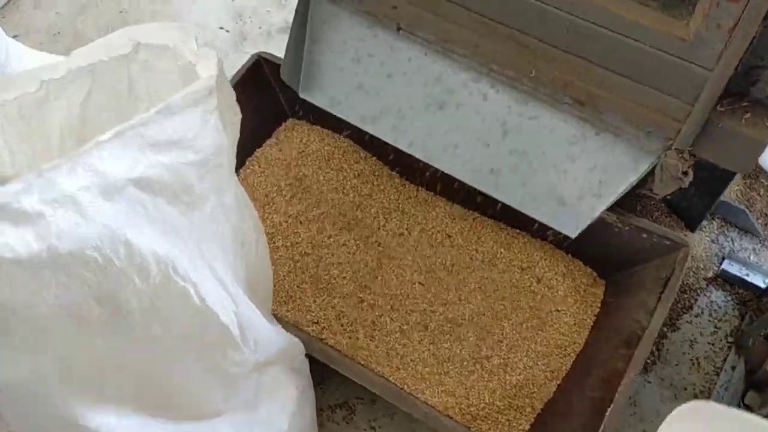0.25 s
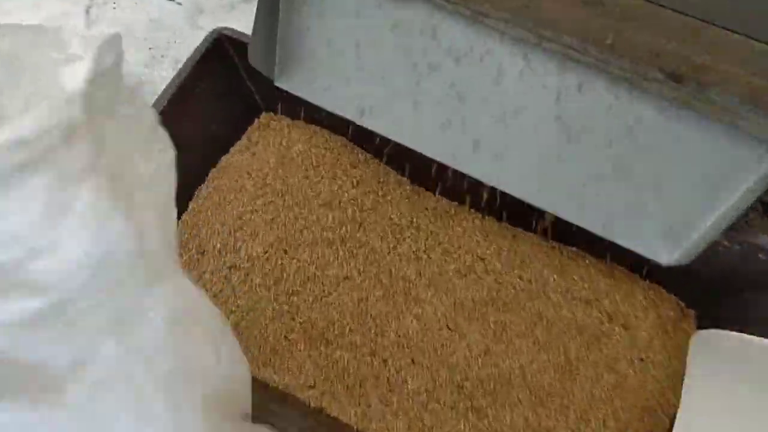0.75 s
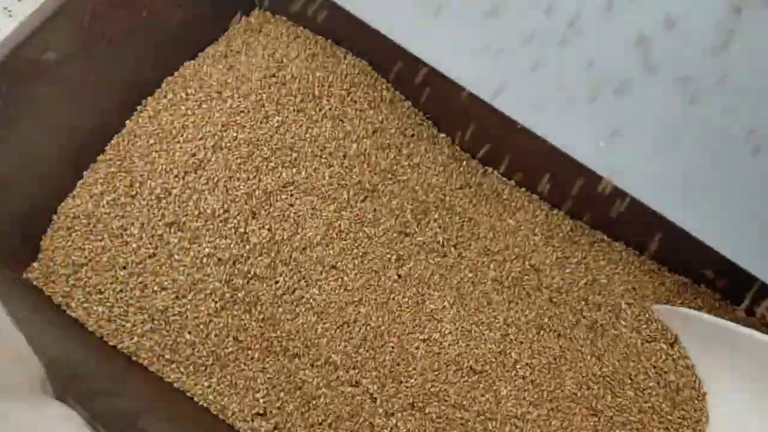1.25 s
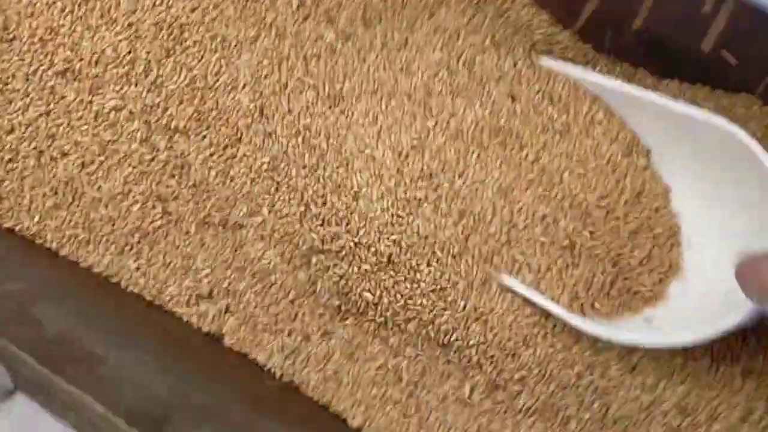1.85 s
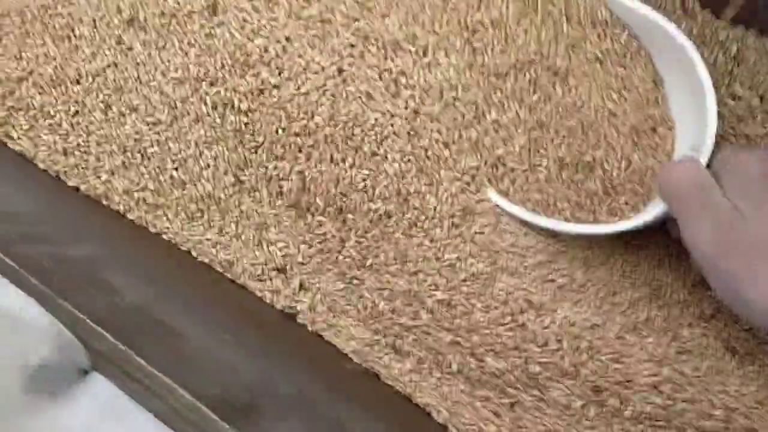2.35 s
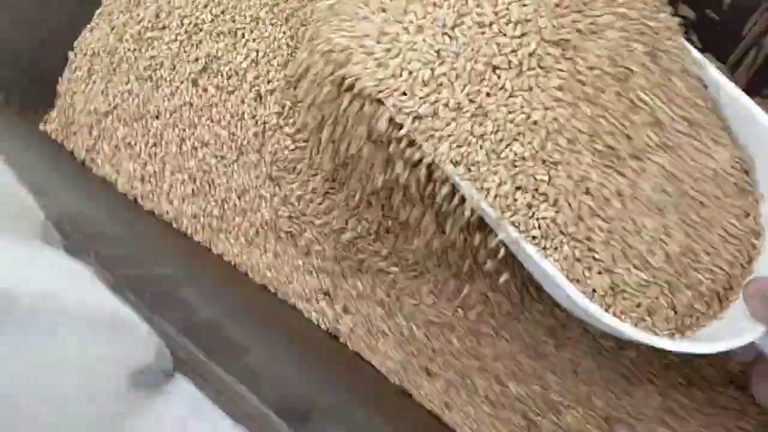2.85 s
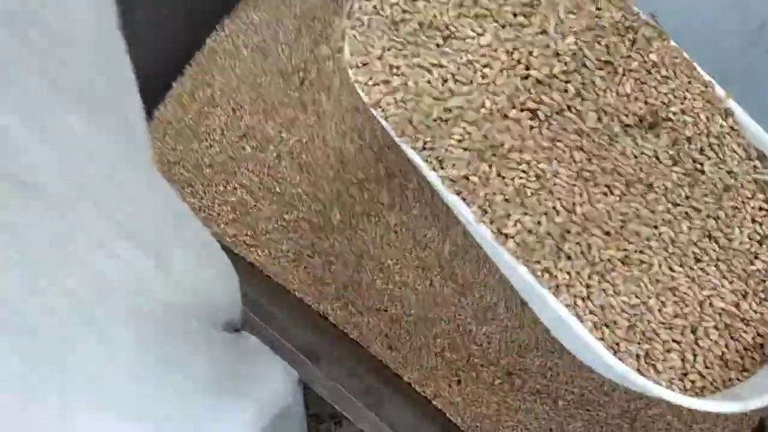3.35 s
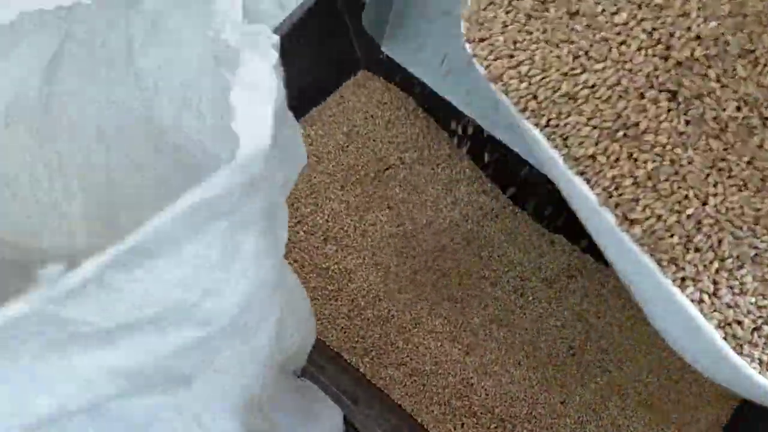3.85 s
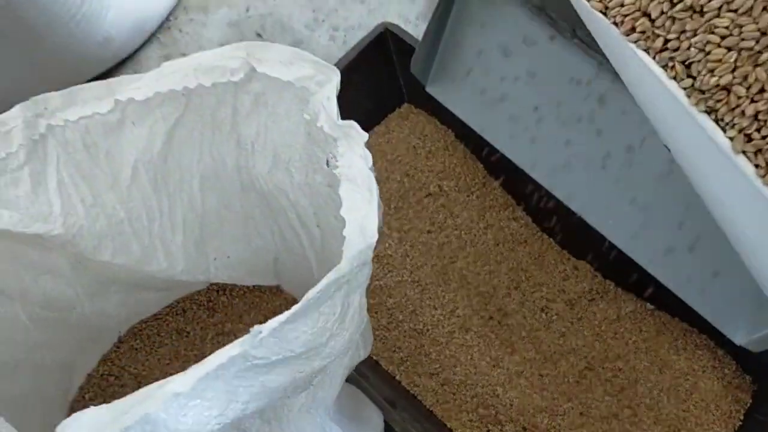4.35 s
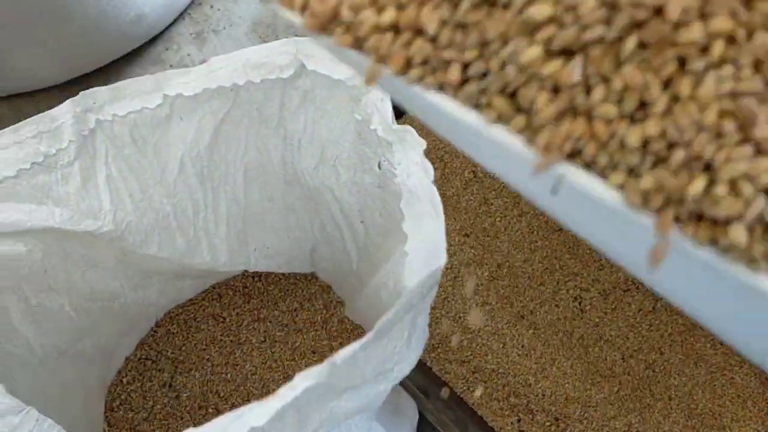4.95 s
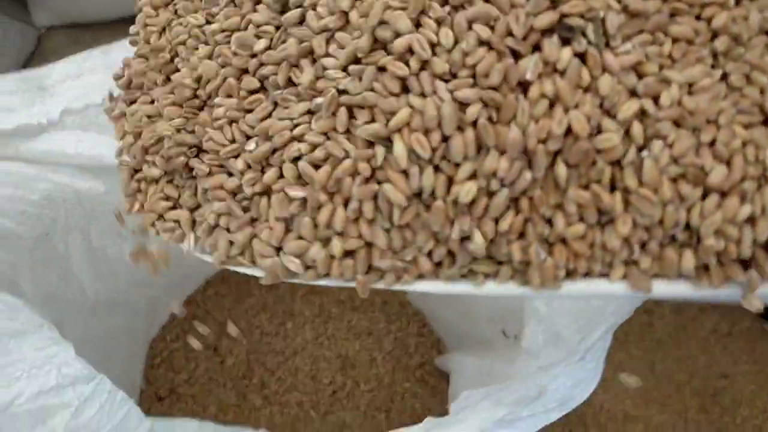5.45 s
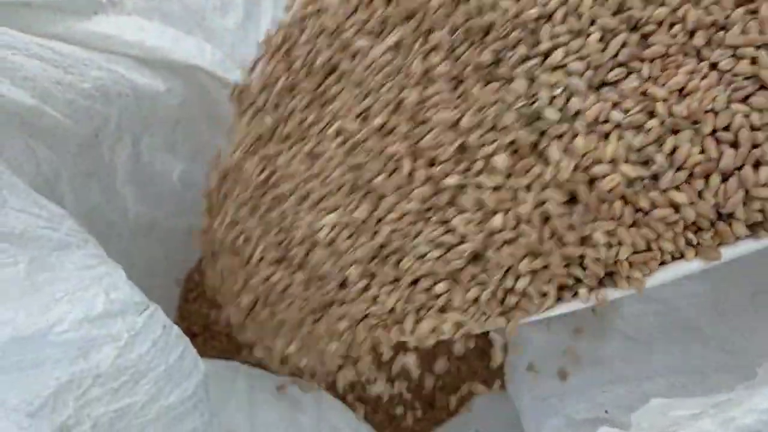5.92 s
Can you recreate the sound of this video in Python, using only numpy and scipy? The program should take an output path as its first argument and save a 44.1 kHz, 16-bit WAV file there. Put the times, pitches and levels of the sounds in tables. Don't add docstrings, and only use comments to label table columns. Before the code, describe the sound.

Inside a workshop, a grain cleaner runs without pause: a low, even fan hum near 175 hertz, broad airy roar and a higher rotor whir whose tones swell and fade. Over it, kernels shaken down a metal chute make a bright, sandy hiss pulsing about six times a second. Small dry ticks land close by. A hand-held microphone moves around the bin, so the balance shifts gently.

```python
import sys
import numpy as np
from scipy import signal
from scipy.io import wavfile
from scipy.ndimage import uniform_filter1d

SR = 44100
rng = np.random.default_rng(int(sys.argv[2]) if len(sys.argv) > 2 else 0)


def put_to_file(sound):
    columns = np.atleast_2d(sound).T
    safe = np.clip(columns, -1, 1)
    whole_steps = np.round(safe * 32767)
    wavfile.write(sys.argv[1], SR, whole_steps.astype(np.int16))


def volts(x):
    e = np.asarray(x, float) / 20
    return 10 ** e


N = 272538
SIEVE_HZ = 6.347

# start_s [s], level_db [dB], throb_db [dB]
FAN_DISTANCE = [(0.0, -19.3, 0.6), (0.45, -17.9, 1.1), (0.95, -19.3, 0.8), (1.4, -21.3, 1.6),
                (1.7, -23.1, 0.7), (2.1, -22.1, 2.3), (2.6, -22.9, 1.6), (3.1, -21.4, 1.6),
                (3.6, -19.6, 1.2), (4.1, -17.1, 0.4), (4.7, -17.6, 0.2), (5.2, -17.3, 1.3),
                (5.7, -19.1, 0.5), (6.18, -21.7, 2.1)]


def evened(x):
    return x / np.sqrt(np.mean(x ** 2) + 1e-20)


def read(points, hz):
    f, value = np.transpose(points)
    return np.interp(np.log(hz + 1), np.log(f + 1), value)


def curves(rows, t):
    s, *columns = np.transpose(rows)
    return [np.interp(t, s, c) for c in columns]


def drift(low_hz, top_hz):
    f = np.geomspace(low_hz, top_hz, num=20)
    t = np.arange(0, N + 128, 128) / SR
    sines = np.sin(2 * np.pi * (f[:, None] * t + rng.random((len(f), 1))))
    return np.interp(np.arange(N) / SR, t, evened(sines.T @ f ** -.5))


def coloured(x, points):
    log_gain = read(points, abs(np.fft.fftfreq(4096, 1 / SR))) * np.log(10) / 20
    taps = np.fft.ifft(np.exp(np.conj(signal.hilbert(log_gain)))).real[:2048]
    return evened(signal.oaconvolve(x, taps)[:N])


def away_db(t):
    mean_db = -20
    return mean_db - curves(FAN_DISTANCE, t)[0]


def throb_db(duck=1):
    # start_s [s], depth_db [dB]
    surges = [(0.133, 1.3), (0.26, 2.0), (0.699, 1.5), (1.197, 1.2), (1.587, 1.5), (1.777, 4.1),
              (2.111, 2.1), (2.461, 1.5), (2.991, 1.2), (3.327, 1.0), (3.868, 2.4), (5.15, 2.3),
              (5.612, 1.6)]
    peak_s, lean, duck_s = .0555, .33, .033
    t = np.arange(0, N + 64, 64) / SR
    stroke = 2 * np.pi * SIEVE_HZ * (t - peak_s)
    out = curves(FAN_DISTANCE, t)[1] * (np.cos(stroke) + lean * np.sin(2 * stroke))
    for start_s, depth_db in surges:
        u = np.maximum(t - start_s, 0) / duck_s
        out -= duck * depth_db * u * np.exp(1 - u)
    return np.interp(np.arange(N) / SR, t, out)


def shaft(turn_hz, orders, belt, shake, waver_db, lift_db):
    belt_hz = 2.25
    t = np.arange(N) / SR
    angle = 2 * np.pi * np.cumsum(turn_hz + 0 * t) / SR
    angle = angle + belt * np.sin(2 * np.pi * belt_hz * t + 3.16) + shake * drift(0.401, 9)
    waver = drift(1.198, 12)
    out = np.zeros(N)
    for i, (order, level_db) in enumerate(orders):
        share = (level_db < -3) * min(.15 + order / 18, 1.3)
        loose_db = share * waver_db * np.roll(waver, 31000 * i) + lift_db(order)
        tone = np.cos(round(order) * angle + 2 * np.pi * rng.random())
        out += volts(level_db + loose_db) * np.sqrt(2) * tone
    return out


def fan():
    fan_orders = [(2, -35), (3, -26), (4, -51), (5, -29.5), (6, -27.5), (8, 0), (10, -69), (11, -34),
                  (13, -29), (14, -56), (16, -20.5), (24, -34)]
    return shaft(21.9, fan_orders, 0.024, 0.0049, 1.2, lambda order: 0)


def roar():
    roar_colour = [(20, -22), (38, -4), (60, -9), (150, 0.5), (400, -0.5), (520, -3.5), (800, -2.5),
                   (1200, -9.5), (1450, -5.5), (1650, -10), (1950, -7.5), (2300, -12.5), (3000, -18.5),
                   (7000, -35)]
    level_db = -10.5
    gusts = rng.standard_normal(N) * volts(1.04 * drift(8, 80))
    return volts(level_db) * coloured(gusts, roar_colour)


def placed(x):
    place = [(90, 0.26, 2.5), (175, 0, 0), (330, 0.43, 1), (800, 0.2, 3), (1800, 0.42, 3)]
    facing_until_s, turn_s = 0.5, .06
    hz, s, z = signal.stft(x, SR, nperseg=2048)
    facing = 1 / (1 + np.exp((s - facing_until_s) / turn_s))
    pitch_hz, undone, lift_db = np.transpose(place)
    undone = read(np.transpose([pitch_hz, undone]), hz)[:, None]
    lift_db = read(np.transpose([pitch_hz, lift_db]), hz)[:, None]
    z = z * volts(undone * away_db(s) + lift_db * facing)
    return signal.istft(z, SR, nperseg=2048)[1][:N]


def rotor():
    rotor_orders = [(1, -43), (2, -38), (3, -30.5), (4, -18), (5, -20), (6, -20), (7, -31.5), (8, -26),
                    (9, -28), (10, -32), (11, -26.5), (12, -32), (13, -33), (14, -32), (15, -32), (19, -42),
                    (20, -33), (21, -25.5), (22, -38), (25, -42), (26, -32), (27, -33.5), (28, -30),
                    (29, -32), (31, -42)]
    # centre_s [s], half_s [half length, s], order [centre of group], lift_db [dB]
    standing_waves = [(.3, .3, 4, 12.5), (.85, 0.12, 4, -5), (3.25, 0.34, 4, 4.5), (5.35, 0.22, 4, 3.5),
                      (5.95, 0.34, 4, 3), (.33, .25, 11, 11.5), (2.7, .45, 11, 5), (1.45, .1, 11, 4),
                      (5.3, .2, 11, 4), (1.68, .15, 15, 10), (3.3, .2, 15, 5), (.06, .06, 21, 4),
                      (.5, .06, 21, 4), (1.14, .07, 21, 3), (2.45, .07, 21, 11), (2.85, .12, 21, 8.5),
                      (3.2, .06, 21, 5), (4, .07, 21, 10), (4.29, .08, 21, 9), (4.68, .08, 21, 7),
                      (5.08, .18, 21, 8.5), (5.35, .06, 21, 5), (.25, .1, 28, 5), (.65, .1, 28, 5),
                      (1.44, .07, 28, 6), (2.4, .08, 28, 4), (3.55, .06, 28, 6), (4.7, .12, 28, 9),
                      (5.2, .15, 28, 4), (6.05, .1, 28, 4)]
    group_reach = {4: 2.6, 11: 1.5, 15: .8, 21: 2.4, 28: 3.2}
    # level_db [dB], undone [share of the fan's distance change undone]
    group_rest = [(-1, 0.75), (-1.5, 1.4), (-2, .6), (-2.5, .2), (-3.5, .3)]
    t = np.arange(0, N + 64, 64) / SR
    groups = {}
    for centre, (level_db, undone) in zip(group_reach, group_rest):
        groups[centre] = level_db + undone * away_db(t)
    for centre_s, half_s, order, db in standing_waves:
        lift = db * np.exp(-((t - centre_s) / half_s) ** 2)
        groups[round(order)] = groups[round(order)] + lift

    def lift_db(order):
        total = sum(np.exp(-((order - c) / reach) ** 4) * groups[c] for c, reach in group_reach.items())
        return np.interp(np.arange(N) / SR, t, total)

    return shaft(68.47 + .04 * drift(.3, 3), rotor_orders, 0.038, .02, 1.3, lift_db)


def machine():
    hum_db = curves(FAN_DISTANCE, np.arange(N) / SR)[0]
    flutter_db = .45 * drift(4, 22)
    return volts(hum_db + throb_db() + flutter_db) * (placed(fan() + roar()) + rotor())


def pings(per_s, t60):
    t, out = np.arange(1200) / SR, np.zeros(N)
    for hz in np.geomspace(2600, 13000, num=18) * rng.uniform(.97, 1.03, size=18):
        strikes = rng.standard_normal(N) * (rng.random(N) < per_s / SR)
        ring = np.sin(2 * np.pi * hz * t) * volts(-60 * t / t60)
        out += signal.oaconvolve(strikes, ring)[:N]
    return evened(out)


def rattle(swing_db, lag_s, per_s, spread_db, colour, ringing):
    peak_s = 0.13
    stroke = 2 * np.pi * SIEVE_HZ * (np.arange(N) / SR - peak_s - lag_s)
    wave_db = swing_db * (np.cos(stroke) - 0.16 * np.cos(2 * stroke + 0.25))
    weight = volts(spread_db * np.minimum(rng.exponential(size=N), 4))
    hits = rng.standard_normal(N) * weight * (rng.random(N) < per_s / SR)
    wash = 1.48 * rng.standard_normal(N)
    return volts(wave_db) * coloured(evened(hits) + wash + ringing, colour)


def grain():
    # [sieve swing, dB]
    nearness = [
        (0, -0.5, 2),
        (.5, 0, 3),
        (1.25, 1.5, 3.5),
        (1.7, 1, 1.5),
        (2.3, 1, 2.5),
        (3.1, 1.5, 2.5),
        (3.6, -1, 4.5),
        (4.8, -1, 3.5),
        (5.45, -0.5, 3.5),
        (6.18, -2, 1),
    ]
    rattles = [
        (-48.5, 0.89, .8),
        (-43, 0.76, 0.22),
        (-30, 1, .05),
    ]
    # pitch_hz [Hz], level_db [dB per Hz]
    low_colour = [(1500, -21.5), (2800, 1.5), (4000, -2.5), (5500, -6), (8000, -15), (16000, -40)]
    dull_colour = [(3500, -21), (4880, -12.5), (6240, -6.5), (7400, -1), (7980, 1.5), (8600, -4),
                   (9600, -9), (12000, -6), (16000, -20)]
    bright_colour = [(6000, -42), (9600, -22.5), (12300, -14.5), (13800, -7), (14800, -0.5), (15500, 3),
                     (15800, 1.5), (18000, -4.5)]
    t = np.arange(N) / SR
    near_db, swing_db = curves(nearness, t)
    low_db, dull_db, bright_db = (db + near * near_db + undone * away_db(t) for db, near, undone in rattles)
    clumps_db = drift(13, 120)
    ringing = .45 * pings(30, 0.046)
    low = rattle(.5 * swing_db + 1.2, 0.0082, 9000, 2.5, low_colour, ringing)
    dull = rattle(0.59 * swing_db + 1.0, 0.0042, 9000, 2.2, dull_colour, ringing)
    bright = rattle(.9 * swing_db + 1.5, -0.0076, 9000, 2.4, bright_colour, ringing)
    stream = volts(low_db + 0.92 * clumps_db) * low
    stream += volts(dull_db + 0.75 * clumps_db) * dull
    stream += volts(bright_db + 1.3 * clumps_db) * bright
    return volts(.6 * throb_db(duck=1.5)) * stream


def ticks():
    close_kernels = [(0.399, -27, 3435, -11), (0.6205, -28, 4060, -9), (1.2909, -30, 3057, -13),
                     (1.6836, -32, 3790, -5), (1.8542, -32, 4304, -9), (1.9108, -29, 3516, -8),
                     (2.0643, -31, 3200, -3), (2.0911, -30, 3850, -9), (2.1864, -27, 3160, -10),
                     (2.5259, -28, 4400, -2), (2.6661, -33, 3960, -10), (2.69, -26.5, 3120, -15),
                     (2.8697, -30, 3790, -8), (2.9844, -29, 3740, 2), (3.2974, -29, 3002, -13),
                     (4.2255, -33, 4090, -3), (4.6743, -31, 3950, -9)]
    dull_band = signal.butter(2, [2500, 7000], "bandpass", fs=SR)
    bright_band = signal.butter(2, [7000, 12000], "bandpass", fs=SR)
    out, t = np.zeros(N + SR), np.arange(1500) / SR
    for start_s, peak_db, ring_hz, bright_db in close_kernels:
        dull = evened(signal.lfilter(*dull_band, rng.standard_normal(len(t))))
        bright = evened(signal.lfilter(*bright_band, rng.standard_normal(len(t))))
        crack = (dull + volts(bright_db) * bright) * volts(-60 * t / 0.057) * np.minimum(t / 0.0019, 1)
        ring = 0.76 * np.sin(2 * np.pi * ring_hz * t) * volts(-60 * t / 0.061)
        out[round(start_s * SR):][:len(t)] += volts(peak_db - 8.0) * (crack + ring)
    return out[:N]


def reflections(x, ripple_db, from_hz):
    hz, s, z = signal.stft(x, SR, nperseg=1024)
    field = rng.standard_normal((len(s), len(hz))).T
    field = uniform_filter1d(field, size=2, axis=0)
    field = evened(uniform_filter1d(field, size=24, axis=1))
    depth_db = ripple_db * np.clip(np.log2((hz + 1) / from_hz), 0, 1)[:, None]
    return signal.istft(z * volts(depth_db * field), SR, nperseg=1024)[1][:N]


def scene():
    return reflections(machine() + grain() + ticks(), 2.02, 860)[None]


def band_limit(x):
    return signal.sosfilt(signal.butter(12, 17080, fs=SR, output="sos"), x)


def record(dry):
    edge_hz = 15740
    taps = signal.firwin(1535, edge_hz, window=("kaiser", 9), fs=SR)
    limited = signal.oaconvolve(dry, taps[None], "same")
    return band_limit(limited)


dry = scene()
out = record(dry)
put_to_file(out)
```